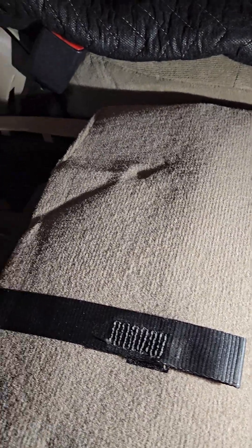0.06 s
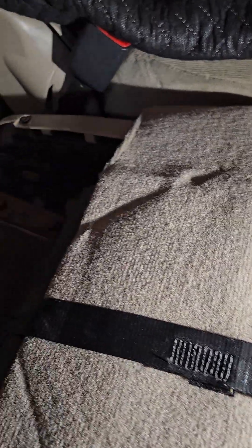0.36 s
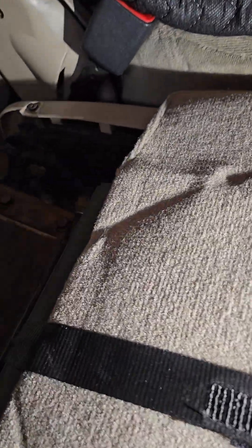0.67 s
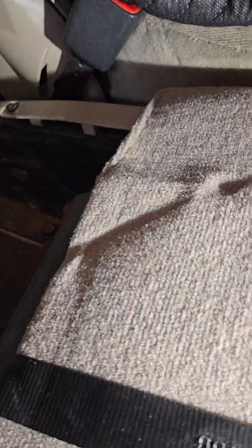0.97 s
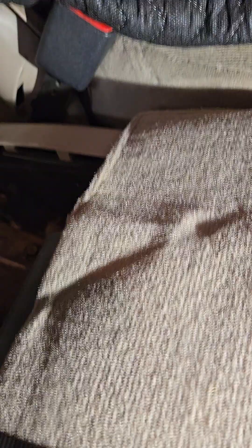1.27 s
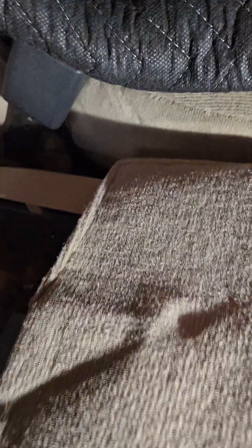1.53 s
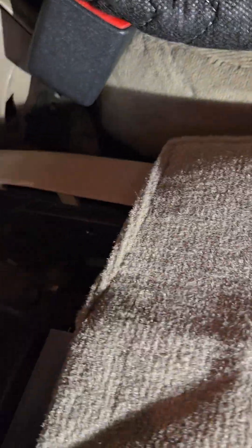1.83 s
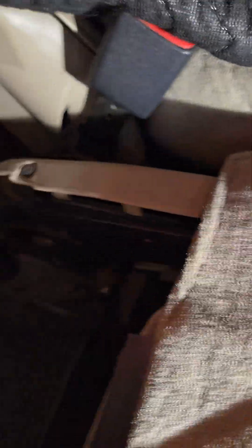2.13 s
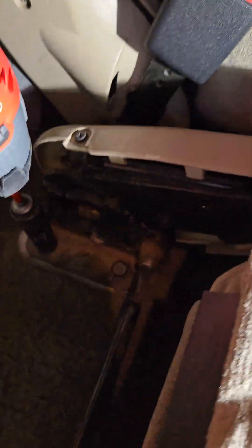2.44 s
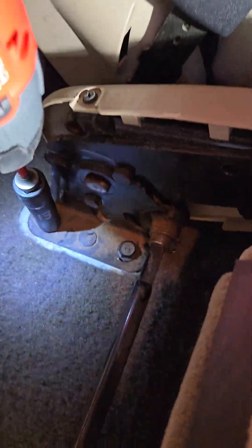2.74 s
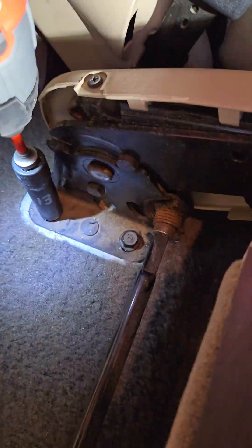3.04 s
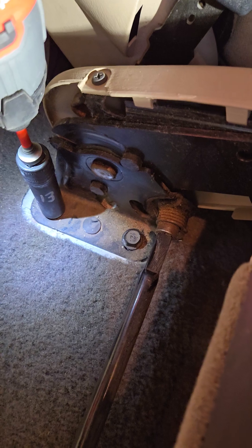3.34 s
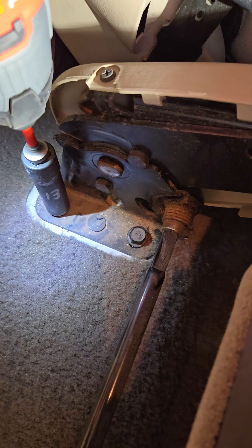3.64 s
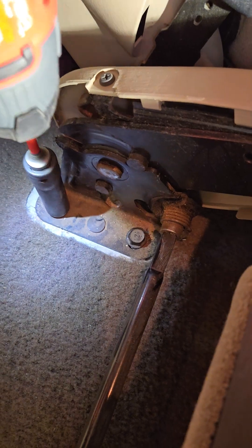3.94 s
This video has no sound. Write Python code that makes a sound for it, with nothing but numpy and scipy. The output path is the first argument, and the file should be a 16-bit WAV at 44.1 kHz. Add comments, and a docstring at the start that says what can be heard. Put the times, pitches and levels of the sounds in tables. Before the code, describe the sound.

A power driver rattles twice briefly on a bolt, amid metal clacks inside a vehicle.

```python
"""A power driver with a long socket, triggered twice inside a vehicle cab: its speed control whistles,
the gears run up, the drive hammers, the socket rattles on a bolt and the mount thumps into the floor
pan as the first run stops. Around it a tool clacks against the steel seat frame, fittings tick and
clothing brushes a seat, over a low machine hum and rumble."""
import sys
import numpy as np
from scipy import signal
from scipy.fft import rfft, irfft, next_fast_len
from scipy.io import wavfile
from scipy.ndimage import map_coordinates

SR = 44100
rng = np.random.default_rng(int(sys.argv[2]) if len(sys.argv) > 2 else 0)


def waveform_to_disk(signal):
    """Save audio, clipped to [-1, 1], as 16-bit WAV at the path in sys.argv[1]."""
    frames = np.transpose(np.atleast_2d(signal))
    scaled = np.clip(frames, -1, 1) * 32767
    samples = np.round(scaled).astype(np.int16)
    wavfile.write(sys.argv[1], SR, samples)


N = 176400
T = np.arange(N) / SR
AGE = np.arange(SR // 3) / SR  # seconds since a blow


def gears():
    """Teeth chatter in the resonant housing; the low shake grows faster with load than the rest."""
    # One list per run. Each row: time in seconds, level in dB.
    runs = [
        [(2.678, -61), (2.685, -37), (2.72, -36.5), (2.772, -23), (2.775, -16), (2.802, -18.5), (2.811, -19.5),
         (2.826, -20.5), (2.843, -24), (2.862, -53), (2.89, -82)],
        [(3.934, -31), (3.939, -24), (3.95, -22), (3.957, -18), (3.975, -19.5), (3.985, -21.5), (3.992, -22),
         (4.0, -19)],
    ]
    # One spectrum per run. Each row: frequency in Hz, level in dB.
    spectra = [
        [(30, -30.5), (110, -6), (250, -1.5), (400, -8), (1100, -12.5), (3800, -11), (5000, -13), (7400, -16),
         (8600, -23.5), (10500, -30), (15000, -23.5)],
        [(30, -32), (200, 6), (340, -8), (430, 4.5), (600, -2), (1400, -1.5), (2200, -4), (4500, -4),
         (7300, -15), (10000, -16), (15500, -22.5)],
    ]
    # Shell peaks and dips. Each row: centre in Hz, width in Hz, gain in dB.
    housing = [(4750, 260, 7.5), (6250, 600, -6.5), (7370, 270, 11), (11970, 370, 11.5)]
    tooth_hz, decay_per_tooth, shake_hz = 329.8, 1.11, 895
    out = np.zeros((2, N))
    for run, spectrum in zip(runs, spectra):
        tooth_phase = np.cumsum(tooth_hz * (1 + .25 * wobble(120))) / SR % 1
        chatter = unit(np.exp(-decay_per_tooth * tooth_phase) * amp(2.05 * wobble(250)))
        load = level([(run[0][0] - .005, -120), *run, (run[-1][0] + .02, -120)])
        grind = resonant(noise(spectrum, ripple_db=2.5), housing)
        shake = filtered(grind, lambda hz: 1 / (1 + (hz / shake_hz) ** 2))
        out += load * chatter * (grind - shake + shake * (load / load.max()) ** 0.57)
    return out


def hammering():
    """Hard metal blows as the drive takes up the load."""
    # Each row: start in seconds, level in dB.
    blows = [(2.7755, -8.5), (2.7796, -11.5), (2.7825, -11), (2.787, -9.5), (2.791, -9.5), (2.7952, -12),
             (2.7989, -10.5), (2.8047, -15), (2.8152, -18), (2.8203, -12), (3.9482, -14.5), (3.957, -16),
             (3.9691, -16)]
    # Each row: frequency in Hz, level in dB.
    spectrum = [(300, -4.5), (750, 1.5), (1100, -8), (1400, 3), (2800, -1.5), (3900, 1), (5300, -4),
                (9000, -33)]
    out = np.zeros((2, N))
    for start_s, db in blows:
        add(out, start_s, amp(db) * burst(spectrum, t60_s=.016))
    return out


def socket_knocks():
    """The socket knocks on the bolt."""
    # Each row: start in seconds, level in dB.
    hits = [(2.7723, -17), (2.8278, -9.5), (3.961, -8), (3.9697, -8.5), (3.977, -13.5)]
    # Each row: frequency in Hz, level in dB.
    spectrum = [(800, -24), (2800, 0), (5000, 1), (6200, -4), (7500, 1.5), (9500, -17), (12500, -5),
                (16000, -8)]
    out = np.zeros((2, N))
    for start_s, db in hits:
        add(out, start_s, amp(db) * burst(spectrum, t60_s=0.017, attack_s=0.00032))
    return out


def speed_control():
    """A whistle whose overtones die as the drive pulses widen."""
    # Each row: start and end in seconds, first and last level in dB.
    whistles = [(2.673, 2.80, -40, -25), (3.9315, 3.96, -28, -30)]
    # Each row: harmonic number, level in dB, t60 in seconds.
    partials = [(1, -1, 15), (2, -13, 0.32), (3, -17, 0.094), (4, -20, .15)]
    pulse_hz = 3876
    out = np.zeros(N)
    for on_s, off_s, first_db, last_db in whistles:
        phase = 2 * np.pi * pulse_hz * T + .15 * wobble(120)
        age_s = np.maximum(T - on_s, 0)
        tone = sum(amp(db - 60 * age_s / t60_s) * np.sin(k * phase) for k, db, t60_s in partials)
        out += tone * level([(on_s - .002, -120), (on_s, first_db), (off_s, last_db), (off_s + .05, -120)])
    return out


def floor_pan():
    """Carpeted sheet steel answers a blow with a few damped low modes."""
    # Each row: start in seconds, level in dB, pitch in Hz, t60 and attack in seconds.
    thumps = [(0.288, -26.5, 198, 0.1, .002), (0.821, -28.5, 342, 0.073, 0.0026),
              (0.97, -23.5, 138, 0.075, 0.0053), (1.003, -23, 305, 0.036, 0.0032),
              (1.844, -25.5, 42, 0.5, .005), (1.8658, -15, 234, 0.034, 0.00063),
              (2.043, -17, 79.9, 0.29, 0.0052), (2.083, -14, 72.4, 0.19, 0.0036),
              (2.79, -18, 106, 0.056, 0.00069), (2.857, -21, 70, 0.18, 0.0043),
              (2.924, -29, 226, 0.1, 0.0054), (2.8446, 2.5, 244, 0.046, 0.0035),
              (2.872, -12, 176.7, 0.11, 0.0037), (3.3958, -9, 248.4, 0.077, 0.0024),
              (3.4011, -8.5, 165, 0.071, 0.0037), (3.955, -27.5, 243, 0.33, 0.0026),
              (3.975, -22.5, 111, 0.067, 0.0023)]
    # Each row: frequency ratio, gain in dB, t60 ratio.
    modes = [(0.993, 4.5, 0.7), (0.553, -11.5, 1.95), (1.425, -10.5, 0.67), (2.85, -9.5, 0.35)]
    out = np.zeros((2, N))
    for start_s, db, hz, t60_s, attack_s in thumps:
        for hz_ratio, mode_db, t60_ratio in modes:
            envelope = amp(db + mode_db) * fade(t60_s * t60_ratio, attack_s)
            add(out, start_s, envelope * np.sin(2 * np.pi * hz * hz_ratio * AGE))
    return out


def seat_frame():
    """A tool strikes the frame: bright crack, hollow body, ring of the steel."""
    # Each row: start in seconds, then crack, body and ring levels in dB.
    clacks = [(1.8124, -6.5, -20.5, -23.5), (1.8159, -18, -33, -31.5), (1.824, -46, -17, -25),
              (1.8275, -15.5, -14, -29.5), (1.849, -44, -21.5, -49), (2.819, -27, -10, -31.5),
              (2.8237, -16.5, -17, -53), (2.843, -31, -20, -51), (3.952, -11, -21, -34.5)]
    # Each row: frequency in Hz, level in dB, t60 in seconds.
    modes = [(428.6, 1.5, 0.21), (621, 5.5, 0.16), (700, 3, 0.13), (975, 2.5, 0.092), (1296, 6, 0.04),
             (1480, 11, 0.045), (1596, 8, 0.038), (2370, 0, 0.05), (3400, -6.5, 0.13), (5389, -5, 0.058),
             (13600, -12, .04)]
    # Each row of both: frequency in Hz, level in dB.
    crack_spectrum = [(530, -30), (1100, -14.5), (1520, 2), (1950, -11.5), (2300, -6.5), (2700, -17),
                      (3380, 1), (3910, -15), (7230, -12.5), (8350, -26), (11100, -28), (14700, -18.5),
                      (16000, -28)]
    body_spectrum = [(25, -37), (80, -4), (220, 6), (330, -8), (510, -3), (640, 1), (800, -1), (940, -1),
                     (1150, -9), (1520, -7), (2000, -17.5), (3300, -17), (6000, -24.5), (12000, -49)]
    out = np.zeros((2, N))
    for start_s, crack_db, body_db, ring_db in clacks:
        ring = 0
        for hz, db, t60_s in modes:
            phase = 2 * np.pi * rng.random() + rng.normal(0, 1, (2, 1)) * min(hz / 1300, 2)
            envelope = amp(db + rng.normal(0, 0.22, (2, 1))) * fade(t60_s, 0.0014)
            ring += envelope * np.sin(2 * np.pi * hz * AGE + phase)
        crack = amp(crack_db) * burst(crack_spectrum, t60_s=0.023)
        body = amp(body_db) * burst(body_spectrum, t60_s=0.075, attack_s=0.0011)
        add(out, start_s, crack + body + amp(ring_db) * ring)
    return out


def ticks():
    """Light contacts of tool, trigger and fittings: a fizzy snap over a duller tock."""
    # Each row: start in seconds, snap, tock and fizz in dB, snap and fizz t60 in seconds, pan in dB.
    contacts = [(0.2848, -26, -24.5, -24.5, 0.013, 0), (.311, -40.5, -37.5, -48, 0.044, -5),
                (0.3838, -36.5, -27, -60, 0.013, -3.5), (0.701, -64, -36.5, -65, 0.023, -10),
                (0.7192, -44, -44, -56, 0.07, -6), (0.7432, -28.5, -21, -54, 0.0042, -15),
                (0.8035, -50, -33, -63, 0.046, 0), (0.925, -49.5, -36.5, -59, 0.042, 0),
                (1.0913, -41, -59, -47, 0.028, -4), (1.1218, -40.5, -52, -41, 0.047, -10),
                (1.143, -35, -64, -34.5, 0.033, -9), (1.16, -37, -60, -32, 0.013, -8),
                (1.211, -46, -48, -46, 0.076, -5), (1.3033, -40.5, -36.5, -45, 0.015, -3),
                (1.983, -31, -31, -32, 0.027, 0), (2.0307, -30, -28, -31, 0.03, -2),
                (2.6254, -37.5, -41, -35.5, 0.019, -3), (2.6937, -20.5, -27, -40, 0.015, 3),
                (3.397, -59, -31.5, -57, 0.016, -3), (3.701, -46, -64, -44.5, 0.027, 1)]
    # Each row of all three: frequency in Hz, level in dB.
    snap_spectrum = [(600, -16), (1800, -6), (4200, 6.5), (6000, 0.5), (7500, 3), (10000, -22),
                     (13000, -16), (16000, -14)]
    fizz_spectrum = [(5000, -33.5), (8000, -5), (10000, -9.5), (13000, 4), (16000, 0.5)]
    tock_spectrum = [(150, -0.5), (400, -0.5), (520, -11), (760, 1), (1000, -4.5), (1400, -3.5),
                     (2500, -18), (12000, -44)]
    out = np.zeros((2, N))
    for start_s, snap_db, tock_db, fizz_db, t60_s, pan_db in contacts:
        snap = amp(snap_db) * burst(snap_spectrum, t60_s)
        fizz = amp(fizz_db) * burst(fizz_spectrum, t60_s)
        tock = amp(tock_db) * burst(tock_spectrum, 1.73 * t60_s, attack_s=0.0004)
        add(out, start_s, panned(snap + fizz + tock, pan_db))
    return out


def socket_tinks():
    """The loose socket rings briefly on its shank: one pitch in a cluster of neighbours."""
    # Each row: start in seconds, level in dB, pitch in Hz, t60 in seconds, share of pure tone.
    tinks = [(0.32, -39, 4100, 0.052, 0.4), (.876, -42, 4000, 0.06, 0.04), (1.112, -41.5, 4140, 0.064, .1),
             (1.136, -34, 4300, 0.04, .3), (1.144, -28.5, 4200, 0.029, 0.5),
             (2.6302, -33, 4260, 0.027, 0.7), (2.929, -45, 3130, 0.026, 0), (2.955, -44.5, 3500, 0.03, 0),
             (3.365, -46.5, 3400, 0.038, 0)]
    # Each row: frequency ratio, level in dB.
    skirt = [(.4, -10), (.85, -8), (1, 6), (1.2, -15), (2.2, -18), (4, -29)]
    out = np.zeros((2, N))
    for start_s, db, hz, t60_s, pure in tinks:
        spectrum = [(hz * ratio, skirt_db) for ratio, skirt_db in skirt]
        cluster = burst(spectrum, t60_s, attack_s=0.00044)
        tone = fade(t60_s, 0.00045) * np.sin(2 * np.pi * hz * AGE + rng.normal(0, 0.38, (2, 1)))
        add(out, start_s, amp(db) * ((1 - pure) * cluster + pure * tone))
    return out


def cloth():
    """Fabric slides on the seat with an uneven grain and two scraping resonances."""
    # Each row: time in seconds, level in dB.
    rustle = [(0, -70), (.1, -66.5), (.17, -53.5), (.32, -51.5), (.46, -62), (.497, -52.5), (.54, -67),
              (.79, -62), (.81, -51), (.87, -51), (.9, -62.5), (1.06, -63.5), (1.14, -53.5), (1.27, -62),
              (1.52, -53), (1.78, -57.5), (1.88, -57), (2.245, -62), (2.275, -53.5), (2.41, -68),
              (2.65, -72), (2.9, -63), (3.05, -68), (3.3, -74.5), (3.39, -58), (3.48, -69.5), (3.9, -66)]
    # Each row: frequency in Hz, level in dB.
    spectrum = [(900, -21), (1900, 6.5), (2500, -10.5), (4300, 1.5), (6000, -3), (7400, 2.5), (8700, -8.5),
                (10500, -11), (12500, -3.5), (16000, -5)]
    # Each row: centre in Hz, width in Hz, gain in dB.
    resonances = [(3120, 110, 10), (5010, 134, 6)]
    grain = amp(1.3 * wobble(45) + 1.5 * wobble(820))
    scrape = resonant(noise(spectrum, ripple_db=2.0), resonances)
    return panned(level(rustle) * unit(grain * scrape), left_db=-7.0)


def idle_whine():
    """The waiting driver's electronics sing faintly, then stutter."""
    # Each row: frequency in Hz, level in dB.
    partials = [(6640, -64), (6150, -69), (9830, -75)]
    on_s, stutter_s, off_s, stutter_hz = 3.535, 3.775, 3.93, 52
    tone = 0
    for hz, db in partials:
        gain = amp(db + 2.7 * wobble(200))
        jitter_rad = 1.6 * np.array([wobble(300), wobble(300)])
        tone += gain * np.sin(2 * np.pi * hz * T + jitter_rad)
    stutter = np.maximum(np.sin(2 * np.pi * stutter_hz * T), 0)
    return tone * (T > on_s) * (T < off_s) * np.where(T < stutter_s, 1, stutter)


def cab_echo(x):
    """The small, padded cab adds a short, dark tail."""
    spectrum = [(100, 11.0), (700, -4.5), (2000, -11.0), (6000, -22.5), (15000, -25)]  # Hz, dB
    tail = noise(spectrum, size=len(AGE)) * fade(t60_s=0.37, attack_s=0.0026)
    return signal.fftconvolve(x, tail / np.linalg.norm(tail[0]), axes=1)[:, :N]


def machine_hum():
    """A slightly wavering hum and its lower octave."""
    # Upper tone. Each row: time in seconds, rms level in dB.
    hum_levels = [(0, -47), (1.3, -48), (2.3, -42.5), (2.7, -40), (3.4, -37), (4, -42)]
    hum_hz, octave_db = 186.7, -53
    phase = 2 * np.pi * np.cumsum(hum_hz * (1 + 0.0062 * wobble(9.3))) / SR
    hum = level(hum_levels) * amp(0.97 * wobble(4.6)) * np.sin(phase)
    octave = amp(octave_db + 0.79 * wobble(24)) * np.sin(phase / 2)
    return np.sqrt(2) * (hum + octave)


def cab_noise():
    """Low rumble, flickering air and a faint ringing."""
    # Each row of all three: frequency in Hz, level in dB.
    rumble_spectrum = [(15, -3), (25, -7), (45, -10.5), (80, 5), (115, -8), (160, -10.5), (230, -7),
                       (400, -27), (800, -78)]
    air_spectrum = [(100, -12.5), (300, -4), (600, -5.5), (750, -11), (1000, -10), (1350, -8.5),
                    (1600, -16.5), (2000, -13), (2600, -21.5), (5000, -30), (6200, -35), (7500, -30.5),
                    (9000, -45), (16000, -64.5)]
    ring_spectrum = [(700, -37), (1000, -1), (1120, 8.5), (1210, -12.5), (1330, 3), (1700, -41)]
    # Each row of all three: time in seconds, level in dB.
    rumble_levels = [(0, -45.5), (.8, -39.5), (1.6, -42), (2.3, -41.5), (3, -42), (4, -40)]
    air_levels = [(0.0, -47), (0.43, -47.5), (1.81, -46.5), (1.94, -44), (2.39, -49.5), (2.66, -48.5),
                  (2.87, -43.5), (3.11, -49.5), (3.9, -49.5)]
    ring_levels = [(0, -57), (.4, -49), (.9, -53.5), (1.4, -66), (4, -75)]
    rumble = level(rumble_levels) * noise(rumble_spectrum)
    air = level(air_levels) * amp(1.3 * wobble(14)) * noise(air_spectrum, ripple_db=1.5)
    ring = level(ring_levels) * noise(ring_spectrum)
    return rumble + air + ring


def noise(spectrum, size=N, ripple_db=0):
    """Coloured stereo noise of rms 1, alike in the bass; ripple adds small resonances above it."""
    # Each row: frequency in Hz, left-right correlation.
    likeness = [(100, 0.95), (250, 0.75), (600, 0.57), (1300, 0), (10000, 0.02)]
    ripple_step_hz = 60
    hz = np.fft.rfftfreq(size, 1 / SR)
    width_rad = np.arccos(np.clip(along(likeness, hz), -1, 1)) / 2
    phasors = np.exp(2j * np.pi * rng.random((2, len(hz))))
    ripple = map_coordinates(rng.standard_normal(size=2048), [hz / ripple_step_hz], mode="mirror")
    gain = amp(along(spectrum, hz) + ripple_db * np.sin(2 * width_rad) * ripple)
    mid, side = irfft(phasors * gain * [np.cos(width_rad), np.sin(width_rad)], size)
    return unit(np.array([mid + side, mid - side]))


def burst(spectrum, t60_s, attack_s=0.00022):
    """A dense cluster of modes dying together."""
    envelope = fade(t60_s, attack_s)
    cluster = noise(spectrum, size=len(AGE), ripple_db=3.5)
    return unit(cluster * envelope) * np.sqrt(np.mean(envelope ** 2))


def fade(t60_s, attack_s):
    """Envelope of a blow."""
    return amp(-60 * AGE / t60_s) * (1 - np.exp(-AGE / attack_s))


def resonant(x, peaks):
    """Colour x with bell-shaped peaks and dips, at rms 1."""
    def response(hz):
        return amp(sum(db * np.exp(-((hz - mid_hz) / width_hz) ** 2) for mid_hz, width_hz, db in peaks))
    return unit(filtered(x, response))


def filtered(x, response):
    """Apply a gain given as a function of Hz."""
    size = next_fast_len(N + 8192)
    return irfft(rfft(x, size) * response(np.fft.rfftfreq(size, 1 / SR)), size)[..., :N]


def wobble(rate_hz):
    """Smooth random curve with knots at rate_hz."""
    return map_coordinates(rng.standard_normal(int(N * rate_hz / SR) + 4), [T * rate_hz])


def along(points, hz):
    """Interpolate (Hz, value) points on a log axis."""
    knots_hz, values = np.transpose(points)
    return np.interp(np.log(hz + 1), np.log(knots_hz + 1), values)


def level(points):
    """Gain per sample from (s, dB) points."""
    return amp(np.interp(T, *np.transpose(points)))


def amp(db):
    """Decibels to gain."""
    return 10 ** (np.asarray(db) / 20)


def unit(x):
    """Scale to rms 1."""
    return x / np.sqrt(np.mean(x ** 2) + 1e-20)


def panned(x, left_db):
    """Set the left channel left_db above the right."""
    return x * amp([[left_db / 2], [-left_db / 2]])


def add(out, start_s, sound):
    """Mix a blow in at start_s."""
    part = out[:, round(start_s * SR):][:, :len(AGE)]
    part += sound[..., :part.shape[1]]


def scene():
    """Driver and contacts echo in the cab; thumps, background and cloth stay dry."""
    near = seat_frame() + ticks() + socket_tinks()
    near += gears() + hammering() + socket_knocks() + speed_control() + idle_whine()
    return near + amp(-17.5) * cab_echo(near) + floor_pan() + machine_hum() + cab_noise() + cloth()


def record(dry):
    """Soft peak limit, then a steep low-pass."""
    ceiling, cutoff_hz = .92, 16000
    rounded = dry / (1 + np.abs(dry / ceiling) ** 8) ** (1 / 8)
    return filtered(rounded, lambda hz: 1 / (1 + (hz / cutoff_hz) ** 150))


dry = scene()
out = record(dry)
waveform_to_disk(out)
```